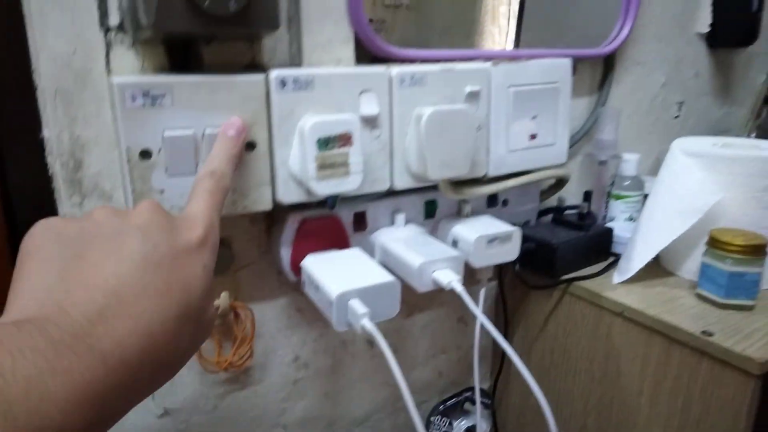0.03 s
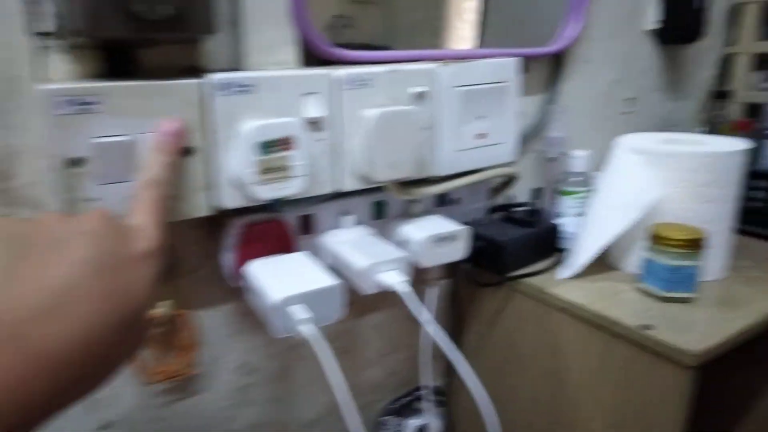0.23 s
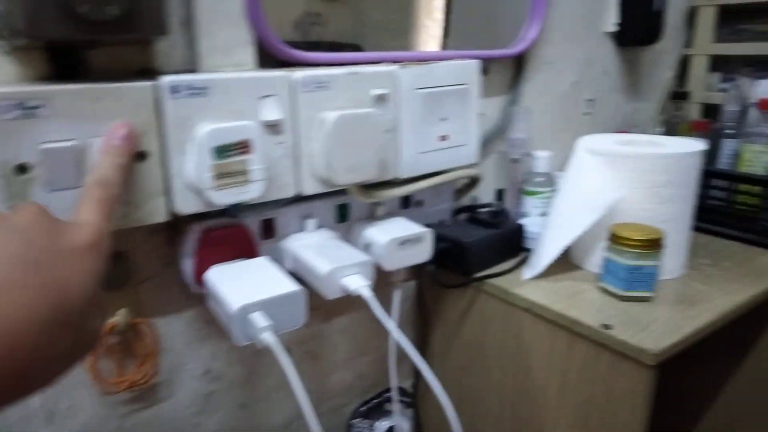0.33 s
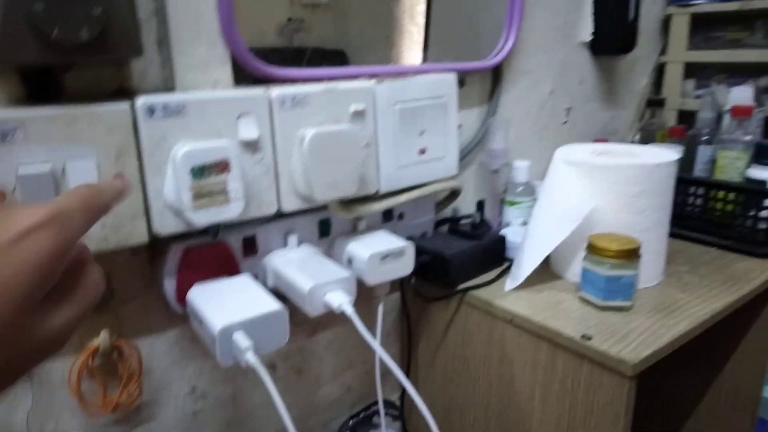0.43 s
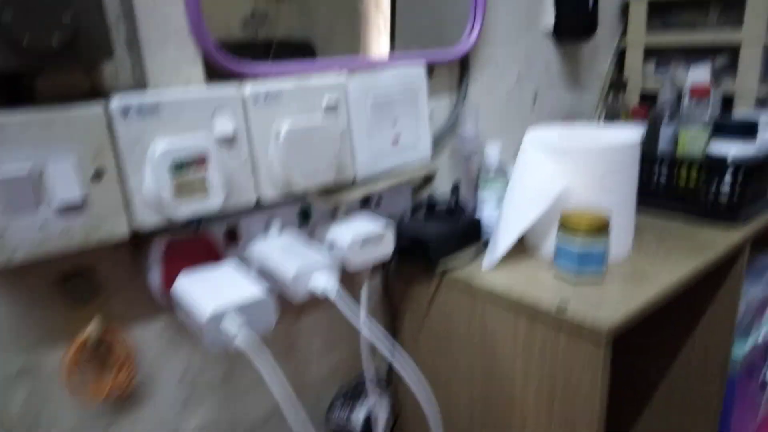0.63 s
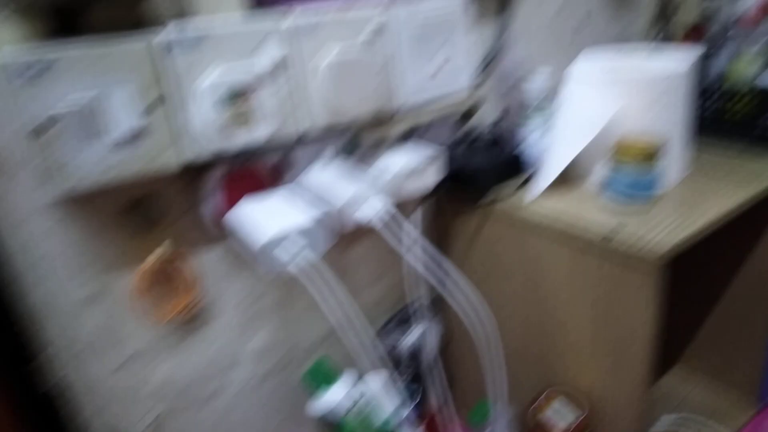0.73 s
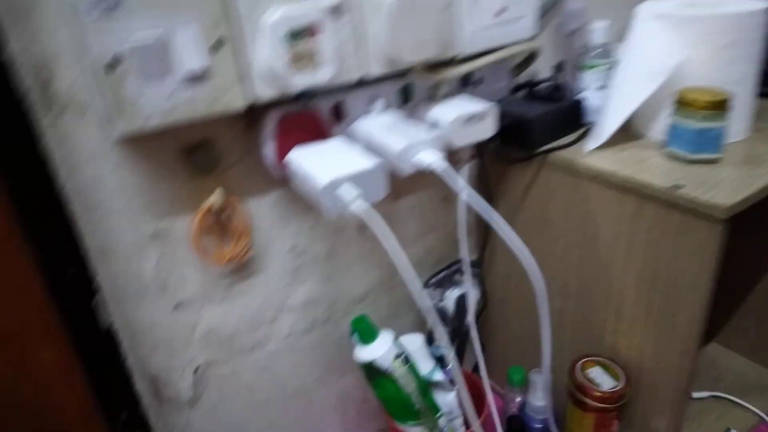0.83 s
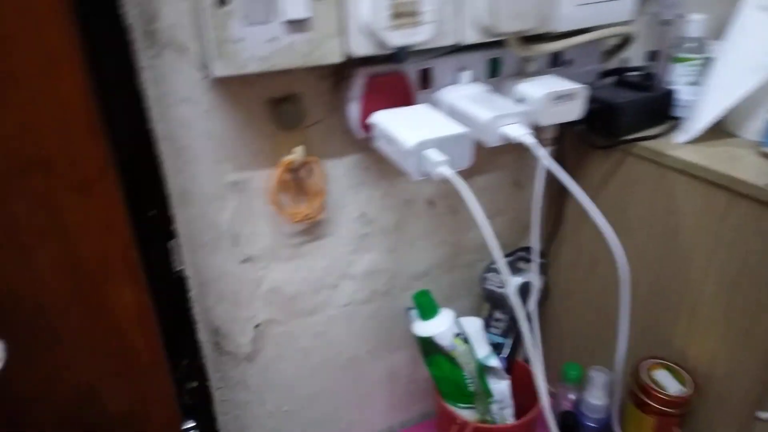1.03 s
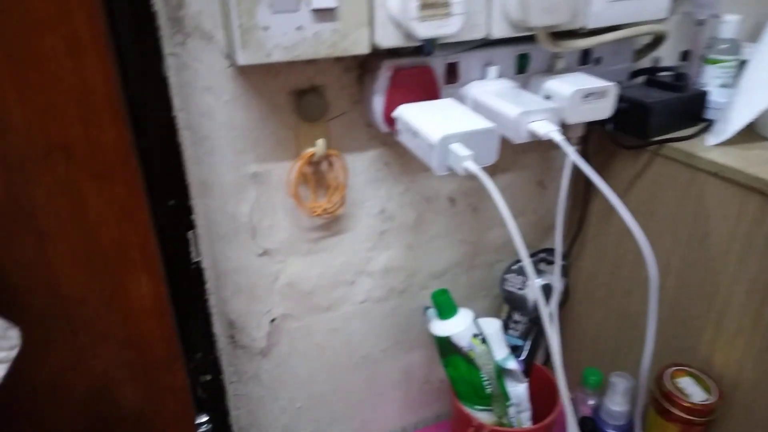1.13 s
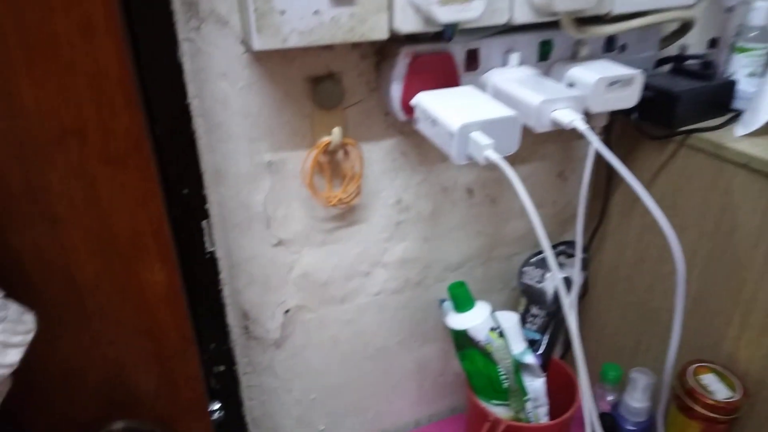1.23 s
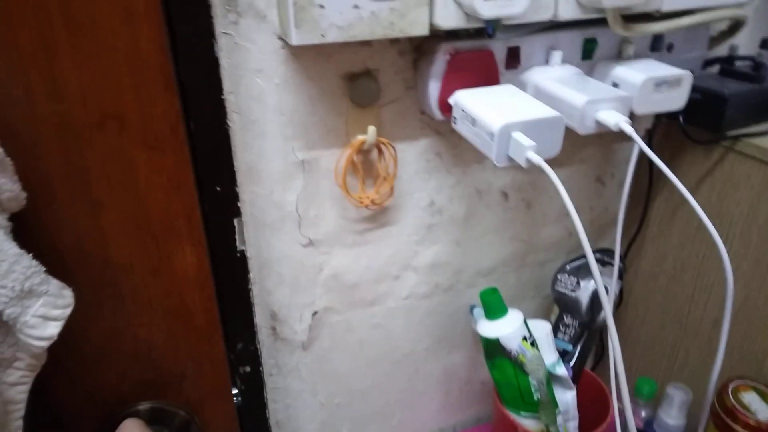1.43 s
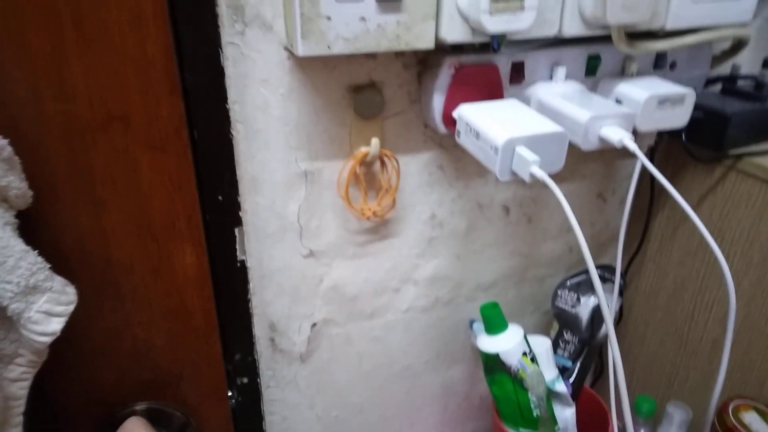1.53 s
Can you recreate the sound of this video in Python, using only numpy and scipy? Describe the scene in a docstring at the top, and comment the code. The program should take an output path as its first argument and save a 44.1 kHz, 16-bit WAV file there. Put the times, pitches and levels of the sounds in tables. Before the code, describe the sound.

One sharp, close click of a wall switch in a small room, then soft handling noise.

```python
"""A plastic wall switch is pressed close to a hand-held phone in a small, hard room. After a light knock
the rocker gives with a tick, then snaps over and rings its face plate. The jolt overloads the
microphones, which swing back slowly. The finger squeaks off the plate and the hand draws away with
faint rustles. Then the phone is moved, with knocks and dull bumps, and last something, perhaps a hinge,
squeaks. A low hum and room noise lie under it all."""
import sys
import numpy as np
from scipy import signal
from scipy.fft import rfft, irfft
from scipy.io import wavfile

SR = 44100
rng = np.random.default_rng(int(sys.argv[2]) if len(sys.argv) > 2 else 0)


def put_to_file(sound):
    """Save the sound as 16-bit audio at rate SR, in the file named by the first command-line argument."""
    columns = np.atleast_2d(sound).T  # one column per channel
    safe = np.clip(columns, -1, 1)
    whole_steps = np.round(safe * 32767)
    wavfile.write(sys.argv[1], SR, whole_steps.astype(np.int16))


N = 70560
TOP_HZ = 15900  # high cut of the whole mix

# rocker hits: first give, snap, rebounds (time [s], crack level [dB], ring level [dB])
ROCKER_HITS = [(0.1983, -11.5, -26), (0.2017, -7.5, -15), (0.2144, -18, -23.5), (0.245, -14.5, -26.5),
               (0.2483, 9.5, 6), (0.2497, 13.5, 11), (0.2507, 7.5, 10), (0.2558, 6.5, 9.5),
               (0.2577, 7.5, 9.5), (0.2614, 5, 4.5)]
# modes of the rocker and its face plate (frequency [Hz], level [dB], t60 [s])
PLATE_MODES = [(211, -19, 0.039), (496, -15, .04), (640.3, -17.5, .04), (743, -20, 0.027), (920, -15, .025),
               (1031, -11, 0.021), (1326, -17.5, 0.02), (1812, -13.5, 0.028), (2015, -12, 0.016),
               (2789, -12.5, 0.015), (3531, -12.5, .045), (4578, -19.5, .03), (5575, -22.5, .03),
               (6436, -13.5, 0.022), (6930, -10.5, .015), (7460, -15.5, 0.059)]
# bright EQ on the crack (frequency [Hz], gain [dB])
CRACK_EQ = [(200, -9.5), (1000, -7.5), (2200, 1.5), (4000, 3), (6300, 3.5), (8000, 4.5), (11000, -1.5),
            (16000, -5.5)]


def switch():
    """Each hit of the rocker is a noise crack plus the ring of the plastic plate."""
    age = clock()[:N // 8]
    cracks, rings = np.zeros((2, N)), np.zeros((2, N))
    for start, crack_db, ring_db in ROCKER_HITS:
        crack = unit(stereo_noise(len(age)) * decay(age, t60=0.013))
        phases = rng.uniform(0, 2 * np.pi, (len(PLATE_MODES), 2, 1))
        ring = sum(amp(db) * unit(np.sin(2 * np.pi * hz * age + phase) * decay(age, t60))
                   for (hz, db, t60), phase in zip(PLATE_MODES, phases))
        i = int(start * SR)
        cracks[:, i:i + len(age)] += amp(crack_db) * crack
        rings[:, i:i + len(age)] += amp(ring_db) * ring
    return eq(cracks, CRACK_EQ) + rings


def mic_jolt():
    """Low thump under the snap: a pressure step leaks away through three slow high-pass stages."""
    snap_s, attack_s, recovery_s = 0.2483, 0.0043, 0.058
    age = np.maximum(clock() - snap_s, 0)
    attack = 1 - np.exp(-age / attack_s)
    leak = age / recovery_s
    swing = np.exp(-leak) * (1 - 2 * leak + leak ** 2 / 2)
    return -amp([[-0.5], [6]]) * attack * swing  # heavier on the right


# light handling hits (time [s], level [dB], t60 [s], high cut [Hz])
KNOCK_HITS = [(0.0165, -12, 0.091, 6960), (0.1294, -29.5, .02, 8000), (0.99, -40, 0.037, 6070),
              (1.017, -34, 0.044, 3500), (1.2738, -10, 0.043, 4500), (1.2977, -21, 0.015, 14000),
              (1.398, -30, .015, 11900), (1.4066, -7, 0.013, 11000), (1.413, -9, 0.025, 6000),
              (1.42, -8.5, 0.024, 14000)]
# body and presence of the knocks (frequency [Hz], gain [dB])
KNOCK_EQ = [(100, -1), (500, 5.5), (1500, -1), (3200, 6), (5500, -0.5), (10000, -0.5), (16000, -2.5)]


def knocks():
    """The moving hand knocks lightly: tight bursts of low-passed noise."""
    out = np.zeros((2, N))
    for start, db, t60, cut_hz in KNOCK_HITS:
        burst = unit(stereo_noise() * decay(clock() - start, t60))
        out += amp(db) * pass_filter(burst + 1e-18, cut_hz)
    return eq(out, KNOCK_EQ)


# the finger leaving the plate, later perhaps a hinge
# (centre [s], length [s], pitch [Hz], level [dB], overtone level [dB])
SQUEAK_CUES = [(0.357, 0.0081, 6563, -26, -33), (0.38, 0.045, 1532, -34.5, -14),
               (0.4, 0.026, 2133, -36.5, -3.5), (0.462, 0.075, 1475, -46, -23),
               (1.287, 0.02, 1429, -40.5, -31.5), (1.34, 0.03, 2010, -49.5, -22),
               (1.36, 0.02, 2360, -47, -15), (1.367, 0.043, 3140, -53.5, -28),
               (1.381, 0.052, 2770, -47.5, -24), (1.468, .02, 3169, -27, -12.5),
               (1.486, 0.011, 3163, -35, -24), (1.509, 0.022, 3188, -34, -2), (1.522, 0.02, 3184, -26, -5),
               (1.547, 0.033, 3201, -27.5, -28)]
# balance of the second to fourth partials (level [dB])
PARTIALS_DB = [0, -3.5, -20]


def squeaks():
    """Stick-slip chirps with a shaky pitch and level, brighter as the grip tightens."""
    wobble_depth, flutter_db, wobbles_per_s = 0.012, 2.8, 1200
    out = np.zeros(N)
    for centre, length, hz, db, overtones_db in SQUEAK_CUES:
        pitch = hz * (1 + wobble_depth * wander(wobbles_per_s))
        phase = 2 * np.pi * np.cumsum(pitch) / SR
        grip = swell(centre, length) * amp(flutter_db * wander(wobbles_per_s))
        overtones = sum(amp(overtones_db + partial_db) * np.sin(k * phase)
                        for k, partial_db in enumerate(PARTIALS_DB, 2) if k * hz < TOP_HZ)
        out += amp(db) * grip * (np.sin(phase) + grip * overtones)
    return out


# thin sliding hisses (centre [s], length [s], band centre [Hz], bandwidth [Hz], level [dB])
SLIDE_CUES = [(0.359, 0.013, 6375, 700, -11), (0.395, 0.065, 6300, 795, -22),
              (0.794, 0.14, 7110, 1124, -45.5), (1.2985, .008, 10300, 599, -25.5),
              (1.465, 0.067, 2920, 600, -27)]


def slides():
    """Light sliding contact: short swells of narrow-band noise."""
    out = np.zeros((2, N))
    for centre, length, hz, width, db in SLIDE_CUES:
        band = pass_filter(stereo_noise(), [hz - width / 2, hz + width / 2], "bandpass")
        out += amp(db) * swell(centre, length) * band
    return out


# pushes of the hand on the phone (centre [s], length [s], level [dB])
BUMP_CUES = [(0.182, .1, -17.5), (0.35, 0.13, -10.5), (0.47, 0.15, -16), (1.043, .05, -24.5),
             (1.311, 0.12, -16.5), (1.438, .08, -21.5)]
# bass-heavy tone of the phone body (frequency [Hz], gain [dB])
BUMP_EQ = [(20, -5), (55, 1.5), (100, -14), (150, -22.5), (220, -16), (400, -37), (1000, -61.5),
           (4000, -79)]


def bumps():
    """Dull mono rumble carried from the hand through the phone body."""
    push = sum(amp(db) * swell(centre, length) for centre, length, db in BUMP_CUES)
    return eq(push * rng.standard_normal(N), BUMP_EQ)


# strokes of the hand (centre [s], length [s], level [dB])
RUB_CUES = [(0.439, 0.066, -38), (0.785, 0.11, -59.5), (1.021, 0.03, -63.5), (1.287, 0.073, -47.5),
            (1.387, 0.13, -54.5), (1.412, 0.061, -46.5), (1.448, 0.045, -50), (1.524, 0.055, -54.5)]
# upper-mid lift on the rustle (frequency [Hz], gain [dB])
RUB_EQ = [(100, -5), (600, 0), (1500, 7), (3000, 8.5), (5000, 2.5), (10000, -5.5), (16000, -2)]


def rubs():
    """The hand rustles: grainy friction noise that follows its pressure."""
    grain_db, grains_per_s = 3, 400
    pressure = sum(amp(db) * swell(centre, length) for centre, length, db in RUB_CUES)
    friction = stereo_noise() * pressure * amp(grain_db * wander(grains_per_s))
    return eq(friction, RUB_EQ)


# thin, bright EQ on the reverb (frequency [Hz], gain [dB])
REVERB_EQ = [(100, -36.5), (500, -13), (1200, -18), (2000, -9.5), (3300, 0), (7000, -4), (16000, -1)]


def room_reverb(send):
    """Early slap off the wall and shelf, then a bare-wall tail whose treble dies slightly sooner."""
    predelay_s, crossover_hz, early_db = 0.0056, 4500, 4.5
    age = clock() - predelay_s
    low_tail = pass_filter(stereo_noise(), crossover_hz) * decay(age, t60=0.4)
    high_tail = pass_filter(stereo_noise(), crossover_hz, "highpass") * decay(age, t60=0.38)
    early = amp(early_db) * stereo_noise() * decay(age, t60=0.13)
    response = eq(unit(early + low_tail + high_tail), REVERB_EQ)
    return signal.fftconvolve(send, response, axes=-1)[:, :N]


# dark tone of the steady room noise (frequency [Hz], gain [dB])
AIR_EQ = [(20, -20), (55, -30), (110, -36.5), (200, -36.5), (450, -32.5), (700, -37), (1200, -49),
          (2000, -57.5), (4000, -76.5), (16000, -86)]
# tones of the hum (frequency [Hz], level [dB])
HUM_TONES = [(100, -79.5), (135, -60.5), (415, -64.5)]
# level of the hiss over time (time [s], level [dB])
HISS_LEVELS = [(0, -43), (0.112, -50.5), (.19, -43.5), (.5, -45.5), (0.681, -48), (.71, -60.5), (.78, -51.5),
               (0.852, -47.5), (.87, -84), (1.24, -71), (1.27, -43), (1.6, -52)]
# mid-forward tone of the hiss (frequency [Hz], gain [dB])
HISS_EQ = [(200, -1), (1200, 6), (2500, -2.5), (5000, -5), (9000, -20), (16000, -8)]


def room_tone():
    """The bed: low room noise, a weak hum and a faint hiss that comes and goes."""
    mid, side = eq(stereo_noise(), AIR_EQ)
    side = eq(side, [(50, -4.5), (250, -5.5)])  # narrows the stereo image
    air = np.array([mid + side, mid - side]) / np.sqrt(2)
    hum = sum(amp(db) * np.sin(2 * np.pi * (hz * clock() + rng.random())) for hz, db in HUM_TONES)
    hiss_db = np.interp(clock(), *np.array(HISS_LEVELS).T)
    hiss = eq(stereo_noise(), HISS_EQ) * amp(hiss_db)
    return air + hum + hiss


def amp(db):
    """Decibels to gain."""
    return 10 ** (np.asarray(db) / 20)


def clock():
    """Time of every sample in seconds."""
    return np.arange(N) / SR


def unit(x):
    """Scale each channel to unit energy."""
    return x / np.sqrt(np.sum(x ** 2, axis=-1, keepdims=True))


def stereo_noise(samples=N):
    """White noise, independent left and right."""
    return rng.standard_normal((2, samples))


def decay(age, t60):
    """Envelope that opens at age zero and falls 60 dB in t60 seconds."""
    return (age >= 0) * np.exp(-np.log(1000) * np.maximum(age, 0) / t60)


def swell(centre, length):
    """Smooth rise and fall around a moment."""
    return np.cos(np.pi / 2 * np.clip(2 * (clock() - centre) / length, -1, 1))


def wander(rate):
    """Random modulation that glides to a new value `rate` times a second."""
    return np.interp(clock() * rate, np.arange(N), rng.standard_normal(N))


def pass_filter(x, hz, kind="lowpass"):
    """Gentle filter with 12 dB per octave slopes."""
    return signal.sosfilt(signal.butter(2, hz, kind, fs=SR, output="sos"), x)


def eq(x, points):
    """Minimum-phase EQ through (frequency [Hz], gain [dB]) points."""
    hz, db = np.array(points).T
    size = 2 * N
    bin_hz = np.maximum(np.arange(N + 1) * SR / size, 1)
    gain = amp(np.interp(np.log(bin_hz), np.log(hz), db))
    cepstrum = irfft(np.log(gain))
    cepstrum[1:N] *= 2  # folded forward, so nothing rings ahead of a hit
    cepstrum[N + 1:] = 0
    return irfft(rfft(x, size) * np.exp(rfft(cepstrum)))[..., :N]


def scene():
    """The mix: switch, hand and squeaks feed the reverb; jolt, bumps and slides stay dry."""
    click, hand, squeal = switch(), knocks() + rubs(), squeaks()
    reverb = room_reverb(click + amp(-5) * hand + amp(-2) * squeal)
    direct_click = amp([[0.5], [5.5]]) * click  # panned right
    on_phone = mic_jolt() + bumps() + slides()
    return direct_click + hand + squeal + reverb + on_phone + room_tone()


# resonances of the left and right microphone ports (frequency [Hz], gain [dB])
LEFT_PORT_EQ = [(100, 1), (1000, -2.5), (3500, -2), (5000, -4), (6000, 1.5), (6900, 3.5), (8200, -9.5),
                (10300, -14), (12500, -18.5), (15500, -13)]
RIGHT_PORT_EQ = [(100, 1.5), (1000, -3.5), (3500, -6.5), (4700, -9), (6100, -19), (7400, -13),
                 (8700, -10.5), (9900, -1), (12000, -14.5), (15500, -22)]


def record(dry):
    """Each port colours its side, the snap clips, and a steep high cut takes off the top."""
    ports = np.array([eq(dry[0], LEFT_PORT_EQ), eq(dry[1], RIGHT_PORT_EQ)])
    high_cut = signal.ellip(10, 0.2, 70, TOP_HZ, fs=SR, output="sos")
    return signal.sosfilt(high_cut, np.clip(ports, -1, 1))


dry = scene()
out = record(dry)
put_to_file(out)
```